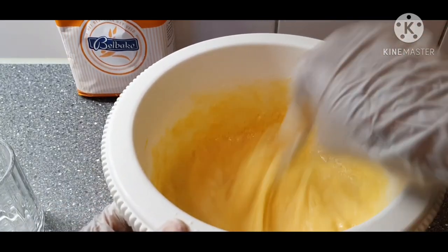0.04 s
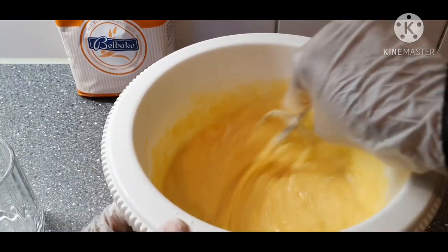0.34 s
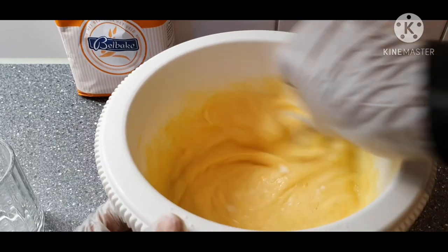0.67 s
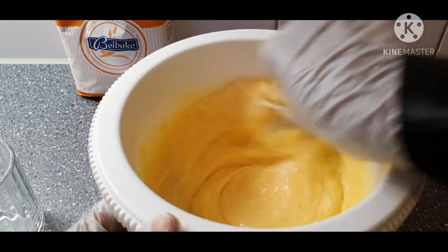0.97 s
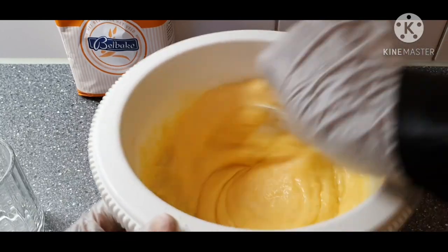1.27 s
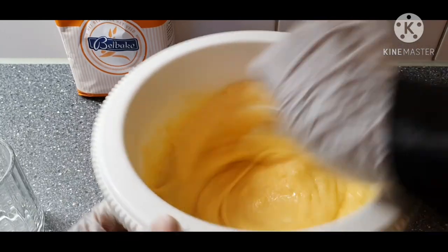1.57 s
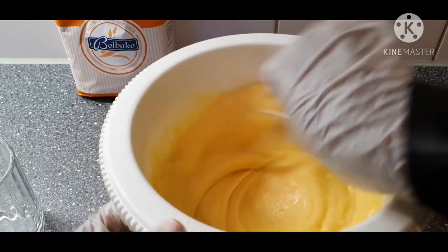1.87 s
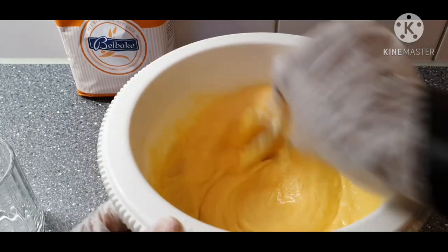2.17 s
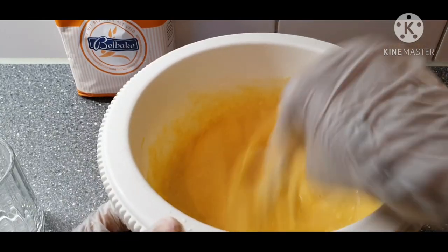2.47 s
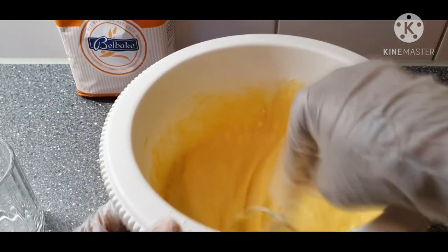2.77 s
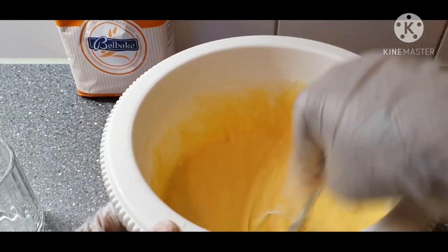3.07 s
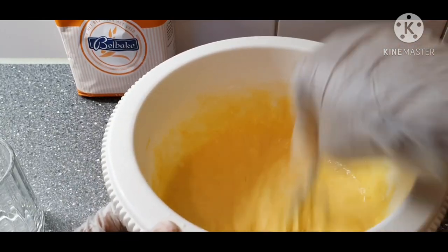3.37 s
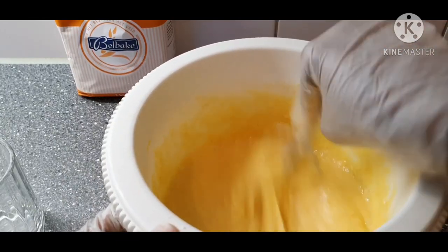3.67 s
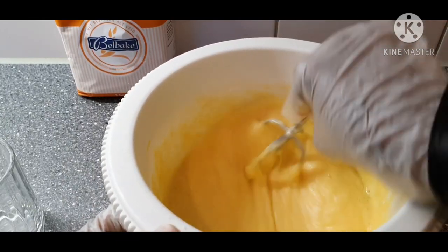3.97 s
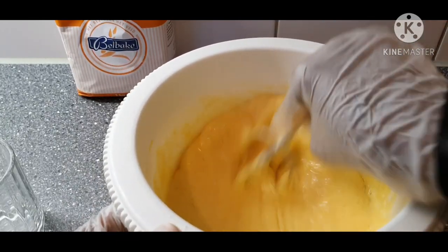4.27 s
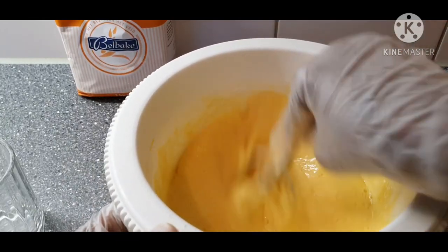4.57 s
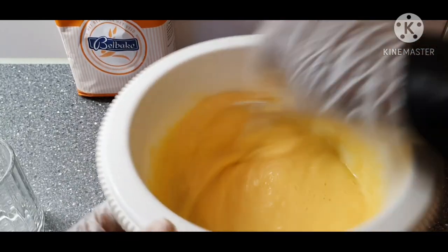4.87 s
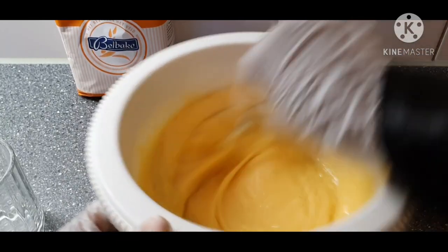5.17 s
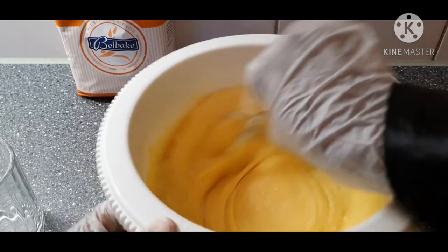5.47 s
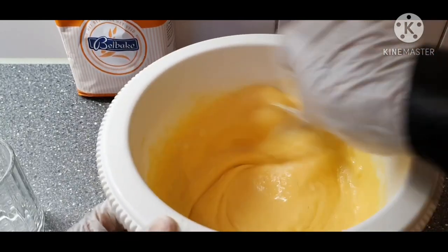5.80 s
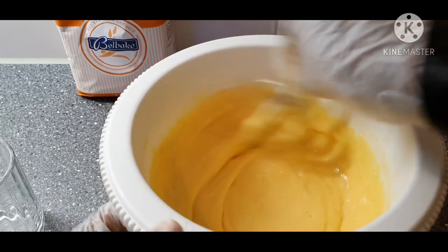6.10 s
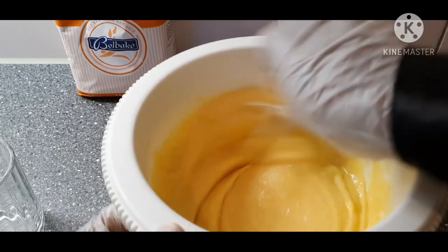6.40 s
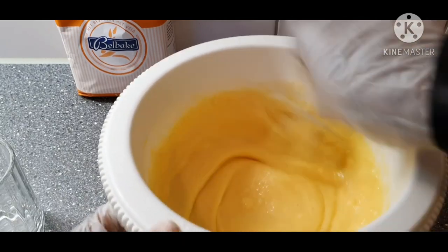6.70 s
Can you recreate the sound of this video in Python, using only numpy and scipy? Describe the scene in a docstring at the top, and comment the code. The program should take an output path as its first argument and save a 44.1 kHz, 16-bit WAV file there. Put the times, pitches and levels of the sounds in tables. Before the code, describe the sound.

Close, rapid whisking of thick batter, the wires clacking against a plastic bowl in circling sweeps and steady squelching strokes.

```python
"""A kitchen counter, where thick batter is beaten with a wire whisk in a plastic bowl.
Each straight stroke, about four a second, squelches in, knocks the bottom, skids on and squelches back.
In circling strokes the wet wires sweep, knock and chatter along the wall: the whole bowl rings hollow,
the plastic clacks, the steel ticks. The batter pops with air pockets, crackles as it tears and sucks
at the wires. The bowl rumbles on the counter and a small room answers."""
import sys
import numpy as np
from scipy import signal
from scipy.fft import rfft, irfft, next_fast_len
from scipy.io import wavfile
from scipy.ndimage import uniform_filter1d

SR = 44100
rng = np.random.default_rng(int(sys.argv[2]) if len(sys.argv) > 2 else 0)


def store_pcm(level_fs):
    """Save levels as 16-bit WAV."""
    pcm = np.round(np.clip(level_fs, -1, 1) * 32767).astype(np.int16)
    wavfile.write(sys.argv[1], SR, np.atleast_2d(pcm).T)


N = 297366

# straight strokes onto the bottom of the bowl:
# knock_s, body_db, wall_db, tick_db, squelch_in_db, squelch_back_db, return_after_s
STRAIGHT_STROKES = [(0.0, -15.5, -32, -52, -40, -31.5, 0.075), (0.2643, -7, -14, -31, -30, -30, 0.078),
                    (0.5203, -4, -20, -43, -30.5, -42, 0.047), (2.295, -33, -35, -49, -32, -30.5, 0.087),
                    (2.5575, -6, -12, -25.5, -26, -33.5, 0.11),
                    (2.8247, -6.5, -9.5, -26, -30, -34.5, 0.096),
                    (3.0902, -7, -11.5, -26.5, -27.5, -29.5, 0.086),
                    (3.347, -8.5, -12.5, -26.5, -27, -26, 0.088),
                    (3.6016, -7, -11.5, -23, -28.5, -29.5, 0.087),
                    (3.8581, -6.5, -14.5, -33.5, -27.5, -35.5, .098),
                    (4.134, -8.5, -11.5, -24, -26, -30, 0.086), (4.3986, -7, -11, -26, -27, -30, 0.097),
                    (4.676, -6.5, -11.5, -35, -28.5, -55, 0.11)]
# hollow ring of the bowl full of batter: pitch_hz, t60_s, bottom_hit_db, upper_wall_hit_db
BODY_RING = [(185, 0.056, -20.5, -79), (212, 0.075, -22, -16.5), (248.3, 0.066, -2, -4.5),
             (277, 0.034, -12, 0.5), (322.7, 0.041, -2.5, -12.5), (368, 0.081, -7, -8.5),
             (460, 0.026, -56, 3.5), (556, 0.032, -17.5, -3), (648, 0.085, -26.5, -36),
             (778, 0.0083, 0.5, -124)]
# clack of the bending plastic wall: pitch_hz, t60_s, bottom_hit_db, upper_wall_hit_db
WALL_RING = [(1340, 0.034, -23, 5.5), (1416, 0.025, -39, 2.5), (1589, 0.019, 0.5, 1),
             (1827, 0.018, 1.5, -4.5), (1985, 0.012, 0.5, -1.5), (2155, 0.028, 1.5, -5.5),
             (2100, 0.19, -22, -32), (2220, 0.2, -17, -38), (2454, 0.017, 2, -5.5), (2690, 0.01, -2.5, -21),
             (2893, 0.023, -10.5, 0), (3170, .016, -4.5, -19), (3858, 0.042, -34, -5.5),
             (4250, 0.011, -8, -24), (5400, 0.013, -36, -47)]
# hard-pressed wires chattering on the wall: start_s, length_s, body_db, wall_db
WIRE_SCRAPES = [(0.003, .027, -25, -37), (0.584, .04, -32.5, -39.5), (0.676, 0.024, -16, -26),
                (0.792, 0.016, -32, -32.5), (0.818, 0.027, -16, -28.5), (0.996, .037, -21.5, -25.5),
                (1.309, 0.029, -30, -27), (1.542, 0.015, -23, -29), (1.613, 0.028, -19, -23.5),
                (1.707, 0.021, -26, -30), (1.741, 0.035, -17, -28), (1.907, .018, -30, -27.5),
                (2.021, 0.039, -20, -27), (5.026, 0.058, -21, -31.5), (5.226, .03, -21, -26),
                (5.341, 0.025, -17.5, -34.5), (5.376, 0.032, -18, -25.5), (5.539, 0.014, -17, -30.5),
                (5.667, 0.026, -21, -32.5), (5.96, 0.034, -26.5, -30.5)]
# wires sweeping along the wall, in long arcs when circling: start_s, length_s, rise_s, level_db
WIRE_SWEEPS = [(0.055, .06, 0.015, -49), (0.198, .05, 0.011, -53), (0.321, .06, 0.014, -48),
               (0.586, .12, 0.054, -44), (0.727, .035, 0.0092, -43.5), (0.782, .075, 0.02, -40.5),
               (0.871, .165, 0.092, -42.5), (1.059, .15, .06, -46), (1.209, .135, 0.04, -42),
               (1.395, .13, 0.018, -45), (1.525, .11, 0.046, -39.5), (1.66, .15, 0.0057, -40.5),
               (1.844, .065, 0.023, -40.5), (2.011, .06, 0.0054, -41.5), (2.08, .07, 0.022, -49),
               (2.142, .065, 0.0091, -40.5), (2.383, .06, 0.014, -50.5), (4.015, .005, 0.0026, -49),
               (4.798, .085, 0.023, -47.5), (4.893, .06, .008, -44.5), (5.005, .25, 0.02, -41.5),
               (5.308, .115, 0.034, -41.5), (5.424, .04, .01, -52.5), (5.479, .055, 0.024, -41.5),
               (5.65, .195, 0.011, -44), (5.94, .12, .01, -43), (6.088, .075, 0.039, -42.5),
               (6.218, .24, 0.028, -43), (6.577, .155, .008, -42.5)]
# dull tone of sucking batter: frequency_hz, level_db
SUCK_SPECTRUM = [(200, -23), (400, 0.5), (680, -1), (1000, -8), (1500, 0), (2200, -5), (3300, -7),
                 (4500, -13.5), (7000, -29.5), (16000, -58)]


def from_db(db):
    """Decibels to gain."""
    return 10 ** (np.asarray(db) / 20)


def rms_one(x):
    """Scale to rms 1."""
    return x / np.sqrt(np.mean(x ** 2) + 1e-20)


def at_hz(points, hz):
    """Read a curve on a log-frequency axis."""
    known, values = np.transpose(points)
    return np.interp(np.log(hz + 1e-9), np.log(known), values)


def cut(x, hz, kind, order=2):
    """Butterworth low- or high-pass."""
    return signal.sosfilt(signal.butter(order, hz, kind, fs=SR, output="sos"), x + 1e-18)


def pan(x, left_db):
    """Lean a sound to the left."""
    return x * from_db([[left_db / 2], [-left_db / 2]])


def noise(spectrum, size=N):
    """Coloured stereo noise, centred in the bass and wide in the treble; rms 1."""
    # left-right likeness of diffuse sound: frequency_hz, correlation
    likeness = [(30, 0.7), (60, 1), (100, 0.96), (280, 0.96), (600, 0.36), (1500, 0.22), (3000, 0.19),
                (6000, 0.21), (16000, -0.18)]
    padded = next_fast_len(size, True)
    hz = np.arange(padded // 2 + 1) * SR / padded
    mid, side = rfft(rng.standard_normal((2, padded))) * from_db(at_hz(spectrum, hz))
    alike = at_hz(likeness, hz)
    stereo = np.sqrt(1 + alike) * mid + np.sqrt(1 - alike) * side * [[1], [-1]]
    return rms_one(irfft(stereo, padded)[:, :size])


def flicker(per_s):
    """A wander that glides between random values."""
    return np.interp(np.arange(N) * (per_s / SR), np.arange(N), rng.standard_normal(N))


def clicks(times, sizes):
    """A train of single-sample blows."""
    return np.bincount(np.clip(np.round(times * SR).astype(int), 0, N), sizes, N + 1)[:N]


def swells(starts, lengths, level_db, attack_s, release_s):
    """An envelope of overlapping swells: each rises, holds until its length is over and dies away."""
    power, t = np.zeros(N + SR), np.arange(int(.6 * SR)) / SR
    for start, length, db, rise in np.broadcast(starts, lengths, level_db, attack_s):
        since = t - min(start, 0)
        shape = np.minimum(since / rise, 1) * np.exp(-np.maximum(since - length, 0) / release_s)
        power[int(max(start, 0) * SR):][:len(t)] += (from_db(db) * shape) ** 2
    return np.sqrt(power[:N])


def ring(blows, hz, t60):
    """One resonance: each blow starts a dying sine."""
    decay, step = from_db(-60 / (t60 * SR)), 2 * np.pi * hz / SR
    return signal.lfilter([0, np.sin(step)], [1, -2 * decay * np.cos(step), decay ** 2], blows + 1e-18)


def strike(modes, times, level_db, place, vary_db, wide_hz, detune):
    """Blows ring the modes by place (0 bottom, 1 upper wall); the shifting batter detunes the bowl."""
    samples = np.arange(N)
    clock = np.cumsum(1 + np.clip(detune * flicker(9), -.2, .2))   # uneven time bends the pitch
    clock *= (N - 1) / clock[-1]
    struck = np.interp(times * SR, samples, clock) / SR
    out = np.zeros((2, N))
    for hz, t60, bottom_db, upper_db in modes:
        luck, side = rng.standard_normal((len(times), 2)).clip(-2, 2).T
        size = from_db(level_db + bottom_db + place * (upper_db - bottom_db) + vary_db * luck)
        lean = min(hz / wide_hz, 1) * side   # short waves reach left and right more unequally
        for channel, sign in enumerate((1, -1)):
            blows = clicks(struck, size * (1 + sign * lean) / np.hypot(1, lean))
            out[channel] += ring(blows, hz, t60)
    return np.array([np.interp(clock, samples, channel) for channel in out])


def radiate(hollow, low_hz=178, top_hz=760):
    """The bowl as a whole gives off next to nothing outside the range of its modes."""
    return cut(cut(hollow, low_hz, "high", order=4), top_hz, "low", order=6)


def knocks(body_db=-3.0, wall_db=-4.5, tick_db=11.5, flex_s=.0001, rebound_s=.0075, rebound_db=-7.5,
           second_wire_s=.0024, second_wire_db=-4.0):
    """Two wires clack in quick succession; the bowl gives a hollow knock and cushioned rebounds."""
    # knocks on the side of the bowl, mostly while circling: time_s, body_db, wall_db, place
    side_knocks = [(0.044, -19, -30.5, .15), (0.669, -15.5, -25, 0.27), (0.7483, -18.5, -19, 0.62),
                   (0.844, -14.5, -14.5, 0.75), (0.9217, -17, -27, 0.8), (0.9931, -11, -24.5, 0),
                   (1.1751, -16.5, -24.5, 0.79), (1.2399, -12, -26, 0.69), (1.31, -10.5, -27, 0.24),
                   (1.479, -16.5, -23, 0.77), (1.544, -13, -25, 0.054), (1.6105, -12, -27, 0.058),
                   (1.7044, -14, -25, 0.52), (1.773, -18, -26, 0.23), (1.8626, -18, -27, .5),
                   (1.928, -16.5, -49, 0.44), (2.1468, -15.5, -29, 0.74), (4.0249, -28, -39, 0.82),
                   (4.503, -31, -43, 0.47), (4.8162, -20.5, -24, 0.31), (4.897, -14, -19, 0.81),
                   (4.9931, -20, -37, 0.28), (5.151, -14.5, -29, 0.61), (5.2246, -11, -24, 0.053),
                   (5.3145, -17, -31, 0.09), (5.4873, -20, -45, 0.35), (5.537, -19.5, -21, 0.63),
                   (5.6584, -16, -21, 0.6), (5.683, -21, -22.5, 0.84), (5.7524, -16, -22.5, 0.85),
                   (5.82, -12, -20.5, 0.29), (5.9495, -19, -32, 0.62), (5.9889, -13, -18, 0.95),
                   (6.063, -17, -17, 0.45), (6.1249, -13.5, -14, 0.95), (6.2388, -24.5, -30, .6),
                   (6.2967, -12.5, -13, 0.88), (6.371, -14, -18.5, 0.86), (6.439, -16, -16, 0.93),
                   (6.586, -10.5, -16, 0.87), (6.657, -17, -20.5, 0.88), (6.7101, -13.5, -11.5, 0.95)]
    on_bottom = [(s, body, wall, tick, 0) for s, body, wall, tick, *_ in STRAIGHT_STROKES]
    # on the side the tick grows faster than the clack, so harder knocks are brighter
    on_side = [(s, body, wall, 1.59 * wall - 6, place) for s, body, wall, place in side_knocks]
    s, body, wall, tick, place = np.transpose(on_bottom + on_side)
    bounce = np.arange(4)[:, None]   # the hit and three rebounds
    jitter = (bounce > 0) * (rng.random((len(s), len(bounce))).T - .5)
    bounce_s = s + flex_s + rebound_s * (bounce + jitter)
    bounce_db = body + body_db + rebound_db * bounce
    hollow = strike(BODY_RING, bounce_s.ravel(), bounce_db.ravel(), np.tile(place, len(bounce)),
                    vary_db=1.0, wide_hz=1270, detune=0.025)
    wire_s = np.r_[s, s + second_wire_s * (.5 + rng.random(len(s)))]
    wire_db = np.r_[wall, wall + second_wire_db] + wall_db
    clack = strike(WALL_RING, wire_s, wire_db, np.tile(place, 2), vary_db=2.5, wide_hz=2140, detune=0.033)
    clack = cut(clack, 1504, "high", order=6)
    steel = ticks(s, tick + tick_db, t60=0.016)
    return pan(-radiate(hollow), 0.75) + pan(clack, 4.2) + pan(steel, .6)


def ticks(times, level_db, t60):
    """Steel touching plastic: a bright spit of noise that dies at once."""
    # tone of the contact: frequency_hz, level_db
    tick_spectrum = [(900, -75), (1500, 8), (3500, 4), (5500, 0), (7800, -11.5), (9500, -5.5), (12000, -11),
                     (16000, -15)]
    decay = from_db(-60 / (t60 * SR))
    fade = signal.lfilter([1], [1, -decay], clicks(times, from_db(level_db)) + 1e-18)
    return fade * noise(tick_spectrum)


def rumble(shove_lead_s=0.046, rock_db=-22.0, drag_db=-4.5, rest_db=-40.0, wander_db=3.0):
    """The bowl shudders on the counter: shoved, rocked and tugged by strokes, dragged by sweeps."""
    # tone of the bowl on the counter: frequency_hz, level_db
    rumble_spectrum = [(20, -56), (45, -17.5), (60, -11), (72, -11.5), (87, 2), (102, -3), (118, -1.5),
                       (145, -11), (230, -6.5), (380, -15.5), (600, -21), (1200, -52)]
    # thumps as the bowl shifts: time_s, level_db
    thumps = [(0.03, -25.5), (0.13, -34), (0.485, -27), (1.02, -35), (1.33, -29.5), (1.64, -28.5),
              (1.86, -37), (1.935, -30), (2.31, -37), (2.438, -26), (2.685, -31), (3.445, -29),
              (3.695, -30), (5.305, -34), (5.556, -35), (6.47, -42)]
    s, body, *_, wait = np.transpose(STRAIGHT_STROKES)
    shoves = swells(s - shove_lead_s, 0.031, level_db=-30.5, attack_s=0.013, release_s=0.011)
    rocks = swells(s, 0.05, body + rock_db, attack_s=0.0022, release_s=0.0175)
    tugs = swells(s + wait, 0.047, level_db=-34.0, attack_s=0.021, release_s=0.019)
    start, length, rise, db = np.transpose(WIRE_SWEEPS)
    drags = swells(start, length, db + drag_db, rise, release_s=0.023)
    s, db = np.transpose(thumps)
    shifts = swells(s, 0.017, db, attack_s=0.0079, release_s=0.028)
    restless = from_db(rest_db + wander_db * flicker(20))
    envelope = np.linalg.norm([shoves, rocks, tugs, drags, shifts, restless], axis=0)
    return pan(envelope * noise(rumble_spectrum), 0.38)


def batter_passes(lead_s=.056, in_s=.05, in_hz=702, back_s=.042, back_hz=648):
    """Straight strokes plough in and pull back: rows of start_s, length_s, level_db, pitch_hz."""
    plunges = [(s - lead_s, in_s, db, in_hz) for s, *_, db, _, _ in STRAIGHT_STROKES if s > lead_s]
    returns = [(s + wait, back_s, db, back_hz) for s, *_, db, wait in STRAIGHT_STROKES]
    return plunges + returns


def hollows(x, depth_db, size=512):
    """Hollows in the batter open and close: brief random resonances colour the sound."""
    frames = signal.stft(x, nperseg=size)[2]
    patches = uniform_filter1d(rng.standard_normal(frames.shape[1:]), size=5, axis=0)
    patches = rms_one(uniform_filter1d(patches, size=4, axis=1))
    return rms_one(signal.istft(frames * from_db(depth_db * patches), nperseg=size)[1][:, :N])


def swish(sweep_db=6.0, scrape_db=-13.5, pass_db=-23.5, spray_db=-4.5, stir_lead_s=0.13, clump_db=3.0):
    """The film of batter tears in a wet crackle as the wires move, and sprays after straight knocks."""
    # tone of the tearing film: frequency_hz, level_db
    wet_spectrum = [(300, -21), (600, -3), (950, -16), (1500, -12.5), (2200, 0.5), (3300, -6), (4400, -6),
                    (5500, -11.5), (7800, -16.5), (9400, -12.5), (12000, -16.5), (15500, -24)]
    start, length, rise, db = np.transpose(WIRE_SWEEPS)
    sweeping = swells(start, length, db + sweep_db, rise, release_s=0.023)
    start, length, _, wall = np.transpose(WIRE_SCRAPES)
    scraping = swells(start, length, wall + scrape_db, attack_s=0.0039, release_s=0.0027)
    start, length, db, _ = np.transpose(batter_passes())
    passing = swells(start, length, db + pass_db, attack_s=0.012, release_s=0.027)
    s, _, _, tick, *_ = np.transpose(STRAIGHT_STROKES)
    spraying = swells(s, 0, tick + spray_db, attack_s=0.002, release_s=0.012)
    stirring = swells(s - stir_lead_s, 0.15, level_db=-52.0, attack_s=0.0069, release_s=0.018)
    envelope = np.linalg.norm([sweeping, scraping, passing, spraying, stirring], axis=0)
    tearing = envelope * hollows(noise(wet_spectrum), depth_db=3.0)
    clumps = rms_one(from_db(clump_db * flicker(110)))
    return pan(clumps * (tearing + sucking()), 0.92)


def sucking(knock_db=-22.5, pass_db=-14.0, rest_db=-45.5):
    """Below the surface the batter sucks dully at the wires and closes behind each straight knock."""
    start, length, rise, db = np.transpose(WIRE_SWEEPS)
    sweeping = swells(start, length, db, rise, release_s=0.055)
    s, body, *_ = np.transpose(STRAIGHT_STROKES)
    closing = swells(s, 0.0067, body + knock_db, attack_s=0.017, release_s=0.025)
    start, length, db, _ = np.transpose(batter_passes())
    passing = swells(start, length, db + pass_db, attack_s=0.0075, release_s=0.01)
    envelope = np.sqrt(sweeping ** 2 + closing ** 2 + passing ** 2 + from_db(rest_db) ** 2)
    return envelope * hollows(noise(SUCK_SPECTRUM), depth_db=4.5)


def scrapes(slips_per_s=375, jitter=0.606, uneven_db=3.5, body_db=-8.5, wall_db=-5.0, grit_db=-23.0,
            place=0.59):
    """The wires stick and slip in a rasp: a fast, half-regular run of small blows on the bowl."""
    runs = [grazes(), skids()]
    for start, length, body, wall in WIRE_SCRAPES:
        count = max(2, int(length * slips_per_s))
        when = start + (np.arange(count) + jitter * rng.random(count)) / slips_per_s
        force_db = uneven_db * rng.standard_normal(count).clip(-2, 1.5)
        runs.append([when, body + force_db, wall + force_db])
    s, body, wall = np.hstack(runs)
    hollow = strike(BODY_RING, s, body + body_db, place, vary_db=6.5, wide_hz=1520, detune=0.066)
    clack = strike(WALL_RING, s, wall + wall_db, place, vary_db=7.5, wide_hz=2450, detune=0.039)
    clack = cut(clack, 1490, "high", order=6)
    grit = ticks(s, wall + grit_db, t60=0.0034)
    return pan(radiate(hollow), 1.0) + pan(clack, 1.3) + grit


def skids(per_s=300, length_s=.085, body_db=-19.0, wall_db=-26.0, fade_db_per_s=150):
    """After a straight knock the wires skid on, ever more lightly: gives time_s, body_db, wall_db."""
    runs, count = [], int(length_s * per_s)
    for s, body, wall, *_ in STRAIGHT_STROKES:
        since = (np.arange(count) + 1 + rng.random(count)) / per_s
        fade_db = fade_db_per_s * since
        runs.append([s + since, body + body_db - fade_db, wall + wall_db - fade_db])
    return np.hstack(runs)


def grazes(per_s=200, wall_db=2.5, uneven_db=5.0):
    """Light touches of the wires swell with each sweep: gives time_s, body_db, wall_db."""
    runs = []
    for start, length, rise, db in WIRE_SWEEPS:
        count = max(1, int(length * per_s))
        since = length * (np.arange(count) + rng.random(count)) / count
        swell_db = 20 * np.log10(np.clip(since / rise, .1, 1))
        force_db = db + swell_db + uneven_db * rng.standard_normal(count).clip(-2, 2)
        runs.append([start + since, force_db, force_db + wall_db])
    return np.hstack(runs)


def squelches(level_db=7.0, pockets_per_s=300, pitch_spread=0.12, ring_cycles=10.4, uneven_db=7.0,
              smack_db=-13.5, glug_db=-8.0, glug_ratio=0.47, muffle_hz=1000):
    """Clusters of air pockets pop; thick batter muffles and damps them, and its torn skin smacks."""
    out, t = np.zeros(N + SR), np.arange(SR // 20) / SR
    for start, length, db, hz in batter_passes():
        count = max(2, int(length * pockets_per_s))
        for k, (size, force, late) in enumerate(rng.standard_normal((count, 3)).clip(-2, 2)):
            large = k % 3 == 2   # every third pocket is large and glugs lower
            pitch = hz * np.exp(pitch_spread * size) * (glug_ratio if large else 1)
            envelope = (1 - np.exp(-2 * pitch * t)) * from_db(-60 * t * pitch / ring_cycles)
            pop = np.sin(2 * np.pi * pitch * t) * envelope
            arch = np.sin(np.pi * np.sqrt((k + .5) / count))   # the squelch swells quickly and fades
            gain = from_db(db + level_db + uneven_db * force + glug_db * large) * arch
            at = int((start + length * (k + abs(late) / 2) / count) * SR)
            out[at:][:len(t)] += gain * pop
    pops = out[:N]
    smack = from_db(smack_db) * np.abs(pops) * noise(SUCK_SPECTRUM)
    return pan(cut(pops, muffle_hz, "low"), 1.0) + smack


def kitchen(x, wet_db=-7.5, t60=0.27, first_wall_s=0.0016):
    """Tiles and cupboards return a short diffuse tail."""
    # tone of the reflections: frequency_hz, level_db
    echo_spectrum = [(40, -17), (120, -5), (250, 1.5), (450, 1), (1000, -0.5), (2100, -2), (5000, 0.5),
                     (16000, 1.5)]
    t = np.arange(SR // 2) / SR
    onset = np.clip(t / first_wall_s - .5, 0, 1)
    tail = noise(echo_spectrum, size=len(t)) * from_db(-60 * t / t60) * onset
    return from_db(wet_db) * signal.fftconvolve(x, rms_one(tail) / np.sqrt(len(t)), axes=1)[:, :N]


def scene(room_tone_db=-53.0, swish_send_db=-2.5, left_lead_s=.00005):
    """Bowl and batter close by and slightly left, the room around them."""
    # low, steady room tone: frequency_hz, level_db
    room_spectrum = [(20, -10), (90, 2), (300, 18), (1000, -5.5), (2200, -31), (7000, -53), (16000, -73)]
    left, right = knocks() + scrapes() + squelches()
    whisk = np.array([left, np.roll(right, round(left_lead_s * SR))])
    batter = swish()
    reverb = kitchen(whisk + from_db(swish_send_db) * batter)
    return whisk + batter + reverb + rumble() + from_db(room_tone_db) * noise(room_spectrum)


def record(dry, stop_hz=16500):
    """Any peak past full scale is flattened; the very top of the treble is cut steeply."""
    return signal.sosfilt(signal.cheby2(14, 60, stop_hz, fs=SR, output="sos"), np.clip(dry, -1, 1))


dry = scene()
out = record(dry)
store_pcm(out)
```